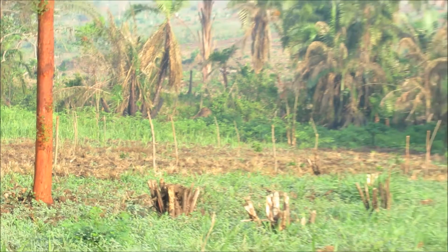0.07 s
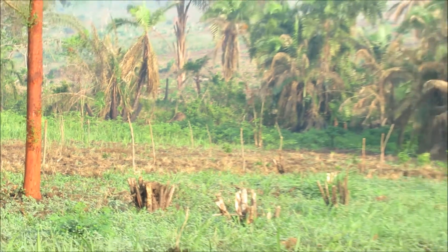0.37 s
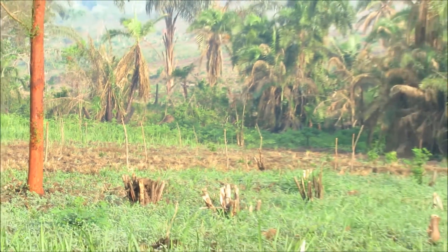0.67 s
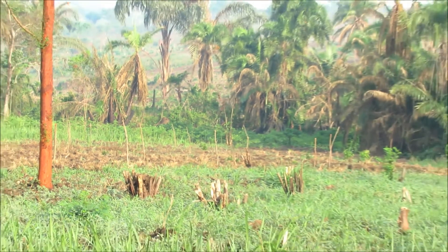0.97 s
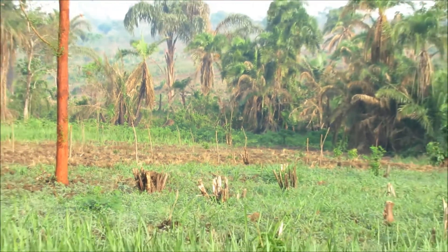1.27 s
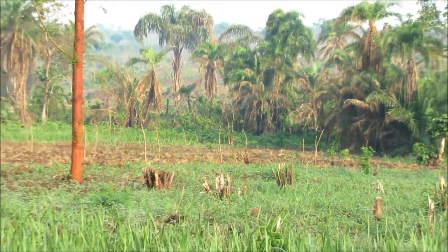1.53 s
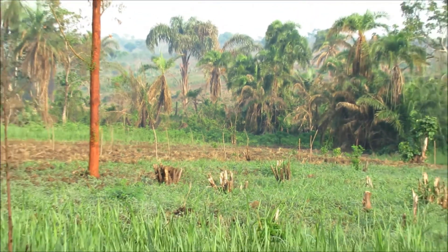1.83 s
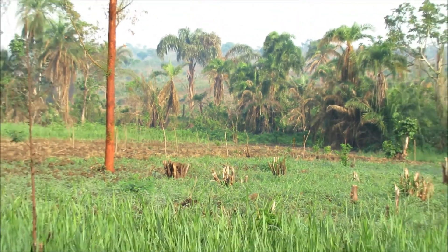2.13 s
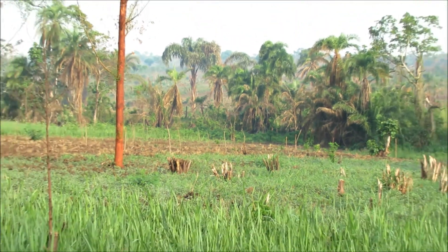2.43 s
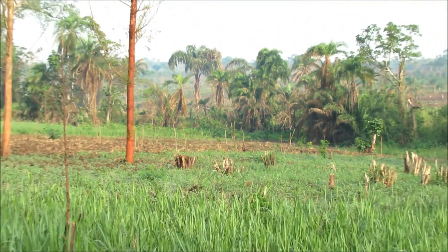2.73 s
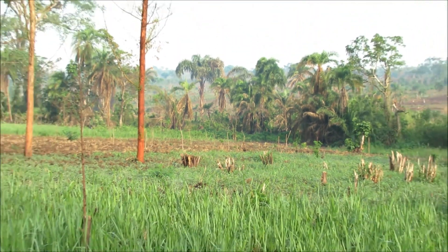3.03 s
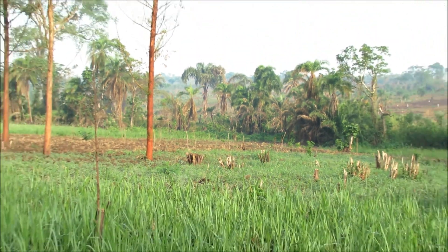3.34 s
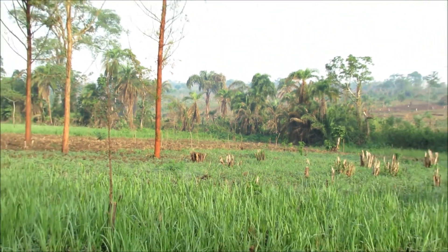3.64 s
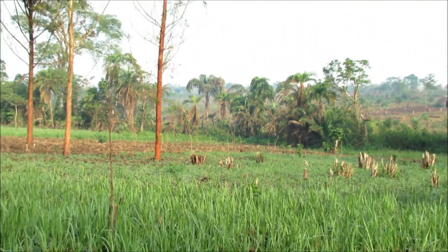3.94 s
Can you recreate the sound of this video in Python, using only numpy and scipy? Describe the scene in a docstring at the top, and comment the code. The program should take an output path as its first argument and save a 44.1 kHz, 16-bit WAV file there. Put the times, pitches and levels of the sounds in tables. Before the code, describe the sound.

Birdsong and buzzing insects in an open field, then a sharp snap on the microphone.

```python
"""Insects buzz steadily near 6 kHz in open farmland, each a rapidly pulsed tone, over soft, wide air.
Small birds slur, whistle and chirp in gliding, near-pure notes that echo off the tree line, and one
far hoot passes. Near the end something snaps on a camera and rings its plastic body; the gain control
ducks the whole field and slowly lets it back, while a hand bumps the body softly."""
import sys
import numpy as np
from scipy import signal
from scipy.fft import rfft, irfft
from scipy.io import wavfile
from scipy.ndimage import uniform_filter1d

SR = 44100
rng = np.random.default_rng(int(sys.argv[2]) if len(sys.argv) > 2 else 0)


def master(y):
    """Save y as 16-bit WAV."""
    cut = np.clip(np.atleast_2d(y).T, -1, 1)
    pcm = np.round(cut * 32767)  # scale
    wavfile.write(sys.argv[1], SR, pcm.astype(np.int16))


N = 176400

# buzzing insects (carrier f/Hz, pulse rate/Hz, level/dB, pan L-R/dB)
INSECTS = [(5770, 272, -52, 6), (5804, 252, -52, 20), (5861, 252, -54.5, 11), (6050, 242, -52, 10),
           (6112, 254, -55.5, 12), (5496, 130, -56, 7), (5393, 225, -58, 4), (6368, 255, -59.5, 6),
           (6289, 240, -61.5, 12), (7065, 250, -67, -2)]
# EQ of the massed far insects (f/Hz, gain/dB)
CHORUS_EQ = [(4000, -23.5), (4700, -7.5), (5000, -4.5), (5500, -1.5), (6100, -3), (6600, -11), (7300, -13),
             (8300, -17), (9700, -20.5), (10900, -16.5), (12000, -22.5), (15000, -27)]
# fader ride on their treble (t/s, gain/dB)
CHORUS_TREBLE = [(0, -2.5), (.8, 1), (1.4, -0.5), (2.2, -2), (3, -4), (4, -9)]
# EQ of air and far foliage, its top end, and the extra EQ on its side channel (f/Hz, gain/dB)
AIR_EQ = [(15, -45), (25, -11.5), (49, -2), (71, 1), (270, -7), (484, -5), (1100, -13), (1340, -9),
          (1460, -11.5), (1630, -10), (2350, -13), (2790, -11), (3390, -12), (4400, -13), (5720, -46),
          (9680, -120)]
AIR_TOP_EQ = [(6000, -18), (9000, -46), (15000, -47)]
AIR_SIDE_EQ = [(60, 6.5), (110, 0), (200, 8), (380, 1.5), (700, 2), (1290, 4.5), (2380, 1), (4400, -2.5),
               (8120, 14), (15000, 7)]
# rising slurs (t/s, length/s, start f/Hz, end f/Hz, level/dB)
SLURS = [(0.015, 0.05, 2130, 3690, -46.5), (0.41, 0.055, 2400, 3340, -42.5),
         (0.819, 0.052, 2400, 3420, -40.5), (1.208, 0.061, 2450, 3580, -43.5),
         (1.605, 0.062, 2464, 3670, -43.5), (1.828, 0.068, 2095, 2890, -51),
         (2.025, 0.043, 2270, 3720, -47), (2.48, 0.042, 2850, 3600, -44.5), (3.536, 0.055, 2800, 3660, -46)]
# plain whistles (t/s, length/s, start f/Hz, end f/Hz, arch/Hz, level/dB, pan L-R/dB)
WHISTLES = [(.175, 0.08, 3000, 2510, -2, -49.5, -14), (0.347, 0.044, 2553, 2970, 5, -45, -2),
            (.385, 0.078, 3060, 2630, 74.5, -43.5, -4), (0.483, 0.087, 3900, 4270, 27, -57, -4),
            (0.573, 0.045, 2530, 2733, -11, -39.5, -5), (0.623, 0.028, 2600, 2140, 0, -45, -8),
            (0.674, 0.025, 2095, 2135, 70, -47, -15), (0.716, .09, 4150, 3200, -100, -54, 3),
            (0.793, 0.059, 3114, 2694, 2, -46, 0), (0.969, 0.058, 2966, 2530, -2, -49.5, 0),
            (1.182, 0.064, 3087, 2690, 23, -42.5, -8), (1.447, 0.15, 3790, 3394, -24, -46, -16),
            (1.578, 0.058, 3135, 2640, -6, -43, -2), (1.723, 0.091, 3354, 2600, 95, -45.5, -7),
            (1.842, 0.115, 3164, 2783, -110, -42, -3), (1.809, 0.046, 2205, 1930, -41, -53, 12),
            (1.9, 0.045, 1835, 1960, 4, -49, 5), (2.076, 0.093, 1950, 1707, 38, -50, 13),
            (2.107, 0.081, 3850, 3550, 214, -49.5, -13), (2.264, 0.057, 3030, 2580, -7, -50.5, -12),
            (2.325, 0.13, 1354, 1503, 6, -55.5, 14), (2.456, 0.04, 4660, 1870, -300, -46.5, -9),
            (2.487, 0.074, 1855, 1620, 20, -51.5, -1), (2.551, 0.066, 1560, 1490, 48, -50.5, 17),
            (2.477, 0.055, 7900, 6300, 348, -54, 2), (2.488, 0.14, 3710, 3300, -4, -47.5, -11),
            (2.653, 0.093, 3125, 2630, 10, -48, -14), (2.756, 0.11, 3364, 2570, 140.5, -46.5, -6),
            (2.892, 0.11, 3150, 2650, 8.5, -42.5, -5), (3.039, 0.096, 2986, 2740, 35, -49.5, -12),
            (3.261, 0.076, 2706, 2875, 60, -52, -4), (3.411, 0.042, 8070, 6200, 93, -49, 3),
            (3.44, 0.095, 3070, 2945, -300, -50, -7), (3.499, 0.044, 6450, 7600, -100, -46, 0),
            (3.864, 0.048, 3056, 2635, 46, -43.5, -6), (3.913, 0.052, 5600, 4610, -12, -45, -1)]
# hooked chirps (t/s, length/s, top f/Hz, level/dB)
HOOKS = [(0.181, 0.053, 4500, -36.5), (0.596, 0.051, 4500, -38), (0.995, 0.054, 4620, -34.5),
         (1.395, 0.055, 4630, -35), (1.793, 0.046, 4550, -37.5)]
# high twitter of a bird farther off (t/s, top f/Hz, level/dB)
TWITTER = [(.538, 5600, -40), (.575, 5400, -43), (.615, 5800, -42), (.653, 5690, -41), (.695, 5700, -44),
           (.768, 5300, -54), (.812, 4910, -44.5), (.889, 5000, -45.5), (.937, 4930, -44.5),
           (1.128, 5250, -46), (1.868, 5770, -43), (1.908, 5750, -42), (1.956, 5750, -48),
           (1.998, 5770, -41.5), (2.208, 5700, -45.5), (2.528, 5260, -45.5), (2.623, 5200, -46),
           (2.671, 5040, -49), (2.958, 5640, -45), (2.995, 5750, -42), (3.04, 5830, -40.5),
           (3.086, 5750, -43), (3.166, 5300, -45)]
# loud chips of a near bird (t/s, top f/Hz, level/dB)
CHIPS = [(3.245, 4490, -37), (3.333, 4540, -36), (3.379, 4530, -35), (3.467, 4540, -34), (3.514, 4580, -33)]
# modes of the plastic body (f/Hz, level/dB, t60/s)
BODY_MODES = [(442, -26, 0.055), (607, -12, 0.0045), (903, -1, 0.028), (1210, -2.5, 0.006),
              (1401, -3, 0.016), (1910, -26, 0.034), (2180, -10, 0.012), (4600, -34, 0.0056),
              (7330, -20.5, 0.0017)]
# the snap and its bounces (t/s, ring gain/dB, tick level/dB)
KNOCKS = [(3.6600, 4.5, -7), (3.6662, -15, -16), (3.6713, 1.5, -24)]
# EQ of the contact tick (f/Hz, gain/dB)
TICK_EQ = [(500, -4), (3000, -7), (4800, -1), (6000, -15.5), (7300, 15.5), (9000, -30), (13000, -2),
           (15500, -19)]
# soft bumps of the hand (t/s, f/Hz, decay/s, level/dB)
BUMPS = [(3.798, 755, 0.007, -28), (3.798, 2820, .004, -34), (3.957, 220, 0.011, -30)]


def undb(db):
    """Decibels to gain."""
    return 10 ** (np.asarray(db) / 20)


def unit(x):
    """Scale to rms 1."""
    return x / np.sqrt(np.mean(x ** 2))


def pan(x, db):
    """Place a sound with the left channel db above the right."""
    return x * unit(undb(np.array([[db], [-db]]) / 2))


def colour(x, points):
    """EQ through (f/Hz, gain/dB) points."""
    hz, db = np.array(points, float).T
    f = np.maximum(np.fft.rfftfreq(x.shape[-1], 1 / SR), 1)
    return irfft(rfft(x) * undb(np.interp(np.log(f), np.log(hz), db)), x.shape[-1])


def band_noise(low_hz, high_hz, n=N):
    """A stereo band of noise at rms 1."""
    band = signal.butter(2, [low_hz, high_hz], "band", fs=SR, output="sos")
    return unit(signal.sosfilt(band, rng.standard_normal((2, n))))


def walk(rate_hz):
    """Smooth random modulation at rms 1."""
    hold = max(int(SR / rate_hz), 1)
    steps = rng.standard_normal(N)[np.arange(N) // hold]
    return unit(uniform_filter1d(uniform_filter1d(steps, hold), hold))


def add(out, start, x):
    """Mix a short sound in at start seconds."""
    i = int(start * SR)
    n = min(x.shape[-1], N - i)
    out[..., i:i + n] += x[..., :n]


def insects(wing_hz=6110, wing_width_hz=350, decay_periods=.72, wander_hz=6.02, throb_db=2):
    """Each stroke restarts a fading tone that rings the wing; pitch and strength waver."""
    resonance = signal.iirpeak(wing_hz, wing_hz / wing_width_hz, SR)
    out = 0
    for hz, rate_hz, db, pan_db in INSECTS:
        stroke = np.cumsum(rate_hz + walk(11)) / SR % 1
        tone = np.sin(2 * np.pi * np.cumsum(hz + wander_hz * walk(60)) / SR)
        wing = signal.lfilter(*resonance, tone * np.exp(-stroke / decay_periods))
        buzz = unit(wing * undb(throb_db * walk(25.16)))
        out = out + pan(buzz * undb(db), pan_db)
    return out


def chorus(level_db=-44, width=.76, flicker_db=.5):
    """Countless far insects merge into a flickering hiss whose treble eases off."""
    mid, side = colour(rng.standard_normal((2, N)), CHORUS_EQ)
    hiss = np.array([mid + width * side, mid - width * side]) * undb(flicker_db * walk(40.38))
    treble = signal.sosfiltfilt(signal.butter(2, 7000, "high", fs=SR, output="sos"), hiss)
    ride = undb(np.interp(np.arange(N) / SR, *np.array(CHORUS_TREBLE).T))
    return pan(unit(hiss + (ride - 1) * treble), db=-1) * undb(level_db)


def air(level_db=-49, drone_hz=68, drone_db=-60):
    """A wide noise bed of air and far foliage over a low, distant drone."""
    mid, side = colour(rng.standard_normal((2, N)), list(AIR_EQ) + list(AIR_TOP_EQ))
    side = colour(side, AIR_SIDE_EQ)
    bed = np.array([mid + side, mid - side]) / mid.std() * undb(level_db + .5 * walk(5.14))
    drone = band_noise(drone_hz - drone_hz / 9.4, drone_hz + drone_hz / 9.4)
    return bed + drone * undb(drone_db)


def distant_song(hz=2820, level_db=-56.5, swell_db=2.2):
    """Distant birdsong blurs into a narrow, swelling band of noise."""
    blur = band_noise(hz - hz / 21, hz + hz / 21)
    return pan(blur, db=-2.5) * undb(level_db + swell_db * walk(14))


def progress(length):
    """Ramp from 0 to 1 through a note of length seconds."""
    return np.linspace(0, 1, int(length * SR))


def sing(out, start, hz, db, pan_db, shape=1, skew=1, waver=.008, flutter_db=2):
    """Mix in one near-pure bird note along the pitch curve hz; skew below 1 makes it peak early."""
    n = len(hz)
    swell = np.abs(np.sin(np.pi * np.linspace(0, 1, n) ** skew)) ** .85 * shape
    flutter = unit(undb(flutter_db * walk(150)))[:n]
    phase = 2 * np.pi * np.cumsum(hz * (1 + waver * walk(250)[:n])) / SR
    third_harmonic = undb(-37) * np.sin(3 * phase) * (3 * hz < SR / 2)
    tone = np.sqrt(2) * (np.sin(phase) + third_harmonic)
    add(out, start, pan(tone * swell * flutter * undb(db), pan_db))


def tree_echo(x, t60, echo_db):
    """The dry sound plus the diffuse tail that the tree line scatters back."""
    t = np.arange(SR) / SR
    tail = rng.standard_normal((2, SR)) * np.exp(-np.log(1000) * t / t60)
    tail /= np.sqrt(np.sum(tail ** 2, axis=1, keepdims=True))
    return x + undb(echo_db) * signal.fftconvolve(x, tail, axes=1)[:, :N]


def slurs(out):
    """A near bird slides each note up an S-curve."""
    for start, length, low, high, db in SLURS:
        glide = np.sin(progress(length) * np.pi / 2) ** 1.9
        sing(out, start, low + (high - low) * glide, db, pan_db=-9)


def flock(out, chatter_per_s=18, centre_hz=5400, spread_hz=420, chatter_db=-53.5):
    """Tiny falling notes: the flock chatters faintly at random and one bird twitters above it."""
    chatter = [(when * N / SR, centre_hz + spread_hz * (2 * pitch - 1), chatter_db)
               for when, pitch in rng.random((chatter_per_s * N // SR, 2))]
    for start, hz, db in list(TWITTER) + chatter:
        stretch, slide = 1 + .25 * rng.uniform(-1, 1, 2)
        fall = .115 * slide * progress(.025 * stretch)
        sing(out, start, hz * (1 - fall), db, pan_db=1.5)


def whistles(out):
    """Farther birds whistle arched glides that peak early and trail off."""
    for start, length, first, last, arch, db, pan_db in WHISTLES:
        u = progress(length)
        sing(out, start, first + (last - first) * u + arch * np.sin(np.pi * u), db, pan_db, skew=.85)


def hooks(out, rise_s=.023, sag_hz_per_s=13700):
    """A near bird's chirp whips up an octave, opening up as it climbs, then sags."""
    for start, length, hz, db in HOOKS:
        t = progress(length) * length
        rise = 1 - .5 * np.maximum(1 - t / rise_s, 0) ** 1.3
        sag = sag_hz_per_s * np.maximum(t - rise_s, 0)
        sing(out, start, hz * rise - sag, db, pan_db=-5.5, shape=rise ** 3.3)


def hoot(out, start=1.548, length=.095, hz=630, arch_hz=150, roughness=.085):
    """One far, arched hoot, made hoarse by fast pitch jitter."""
    u = progress(length)
    jitter = 1 + roughness * walk(320)[:len(u)]
    sing(out, start, (hz + arch_hz * np.sin(np.pi * u)) * jitter, db=-48.5, pan_db=2.2)


def chips(out, length=.027, fall=.2):
    """A near bird's short, loud chips dive ever faster in pitch."""
    for start, hz, db in CHIPS:
        sing(out, start, hz * (1 - fall * progress(length) ** 2.2), db, pan_db=-1.5)


def body_ring(t, push_s=.00067, low_cut_hz=400):
    """A brief push sets the damped modes of the plastic body ringing, in alternating polarity."""
    modes = sum((-1) ** k * undb(db) * np.sin(2 * np.pi * hz * t) * np.exp(-np.log(1000) * t / t60)
                for k, (hz, db, t60) in enumerate(BODY_MODES))
    low_cut = signal.butter(2, low_cut_hz, "high", fs=SR, output="sos")
    return signal.sosfilt(low_cut, modes * (1 - np.exp(-t / push_s)))


def scrape(start=3.6521, length=.008, body_db=-29, hiss_db=-30):
    """Friction hisses and rubs the body into ringing, swelling into the snap."""
    out, t = np.zeros((2, N)), np.arange(SR // 10) / SR
    rub = rng.standard_normal((2, len(t)))
    body = unit(signal.fftconvolve(rub, body_ring(t)[None], axes=1)[:, :len(t)])
    hiss = unit(np.diff(rub, prepend=0))
    swell = np.sqrt(t / length) * (t < length)
    add(out, start, (undb(body_db) * body + undb(hiss_db) * hiss) * swell)
    return out


def snap(tick_decay_s=.0011, left_lag_s=.00056):
    """A snap and two bounces each tick and ring the camera body, right side first."""
    out, t = np.zeros((2, N)), np.arange(SR // 10) / SR
    ring = body_ring(t)
    for start, ring_db, tick_db in KNOCKS:
        ticks = unit(colour(rng.standard_normal((2, len(t))), TICK_EQ)) * np.exp(-t / tick_decay_s)
        for side, lag in enumerate((left_lag_s, 0)):
            add(out[side], start + lag, undb(ring_db) * ring + undb(tick_db) * ticks[side])
    return out


def hand_bumps():
    """A hand bumps the body: soft, fast-dying bursts of band noise."""
    out, t = np.zeros((2, N)), np.arange(SR // 10) / SR
    for start, hz, decay, db in BUMPS:
        thud = band_noise(hz / 1.9, hz * 1.4, len(t))
        add(out, start, undb(db) * thud * np.exp(-t / decay))
    return out


def scene():
    """The steady bed, near and far birds with their own echoes, and the close handling sounds."""
    bed = air() + distant_song() + chorus() + insects()
    near, far = np.zeros((2, 2, N))
    slurs(near)
    flock(far)
    whistles(far)
    hooks(near)
    hoot(far)
    chips(near)
    birds = tree_echo(near, t60=.12, echo_db=-3) + tree_echo(far, t60=.3, echo_db=-5)
    return bed + birds + scrape() + snap() + hand_bumps()


def record(dry):
    """Gain control ducks on a peak and recovers slowly; overload clips; the top is cut."""
    threshold_db, attack_s, release_db_per_s, top_hz = -6, .005, 4, 15400
    over_db = np.maximum(20 * np.log10(np.abs(dry).max(axis=0) + 1e-9) - threshold_db, 0)
    release = release_db_per_s * np.arange(N) / SR
    held_db = np.maximum.accumulate(over_db + release) - release
    pole = np.exp(-1 / (attack_s * SR))
    duck_db = signal.lfilter([1 - pole], [1, -pole], held_db)
    clipped = np.clip(dry * undb(-duck_db), -1, 1)
    return signal.sosfilt(signal.ellip(8, .2, 70, top_hz, fs=SR, output="sos"), clipped)


dry = scene()
out = record(dry)
master(out)
```